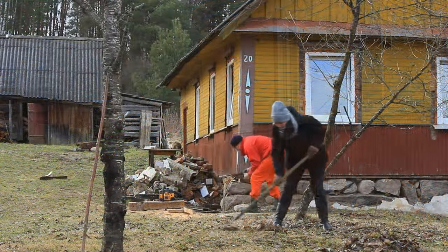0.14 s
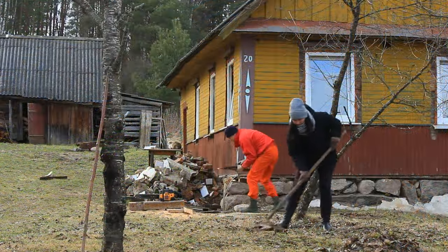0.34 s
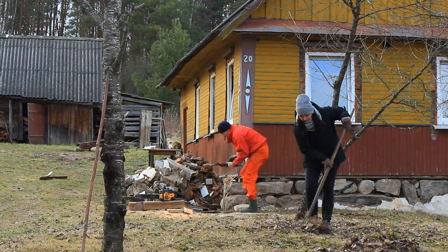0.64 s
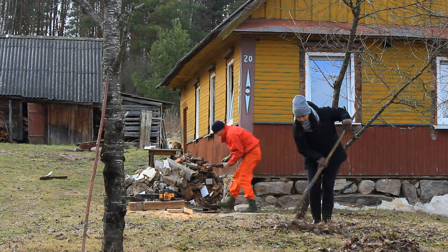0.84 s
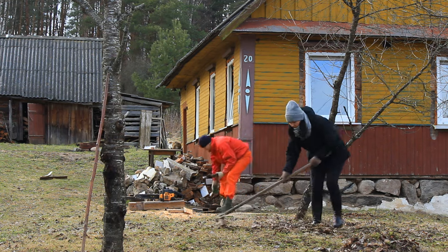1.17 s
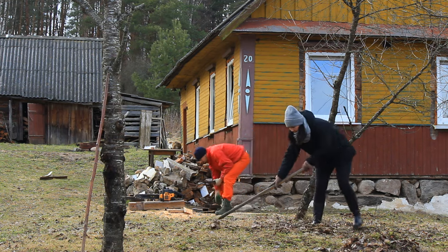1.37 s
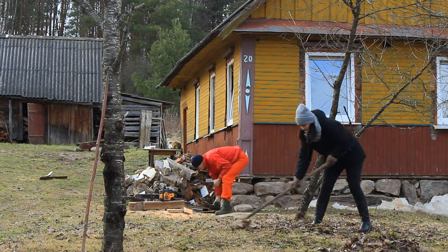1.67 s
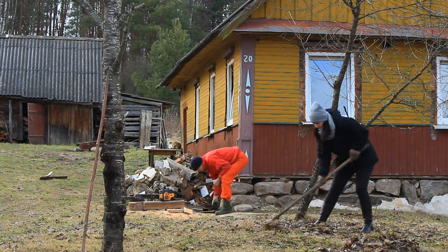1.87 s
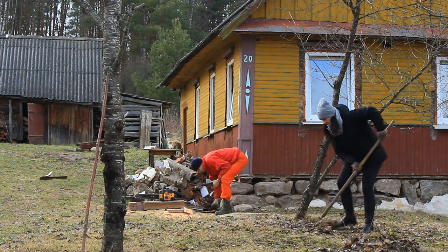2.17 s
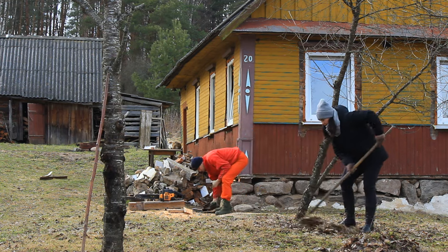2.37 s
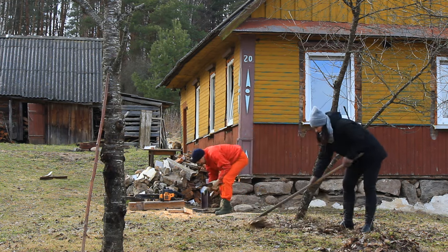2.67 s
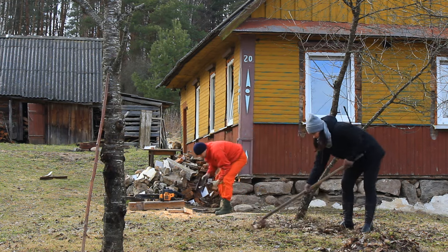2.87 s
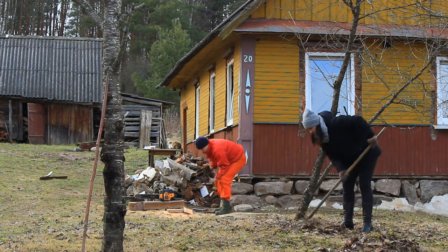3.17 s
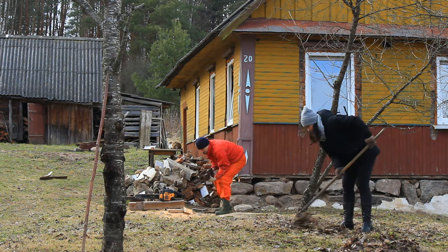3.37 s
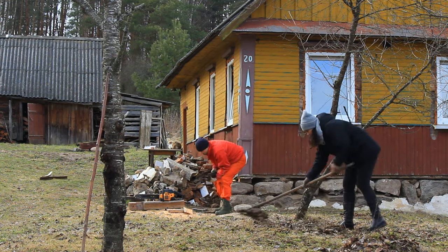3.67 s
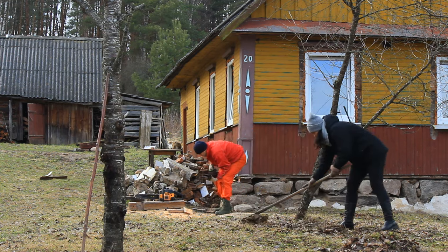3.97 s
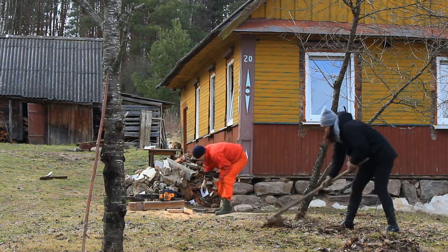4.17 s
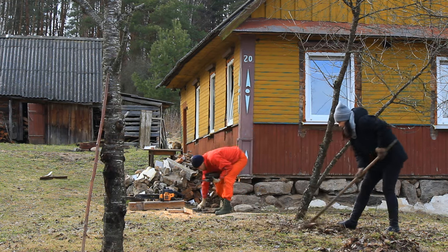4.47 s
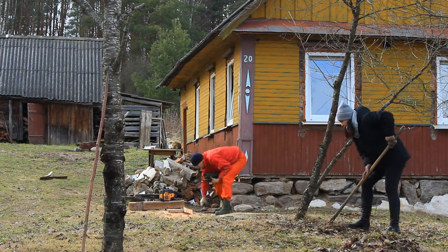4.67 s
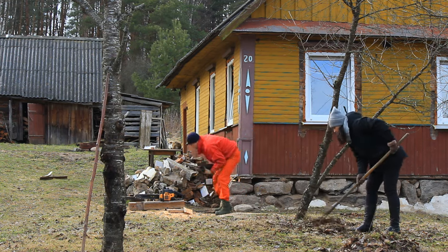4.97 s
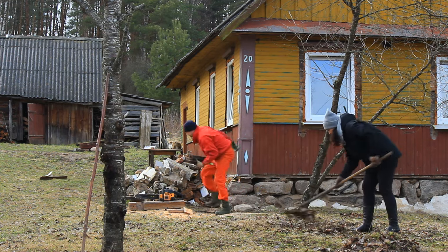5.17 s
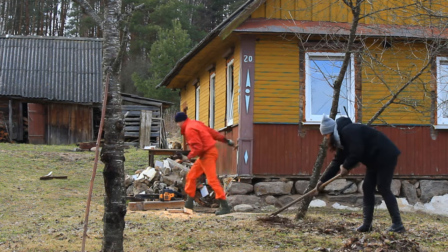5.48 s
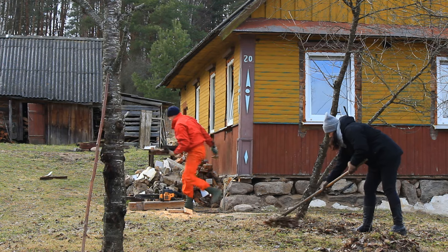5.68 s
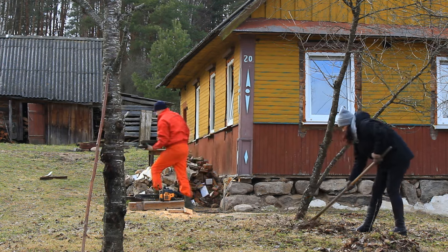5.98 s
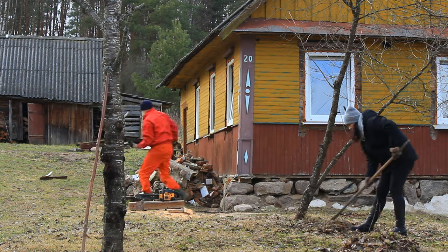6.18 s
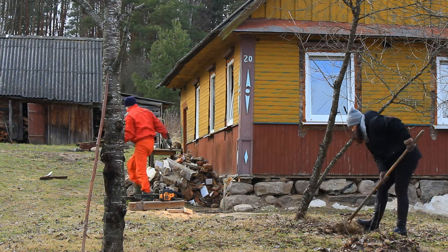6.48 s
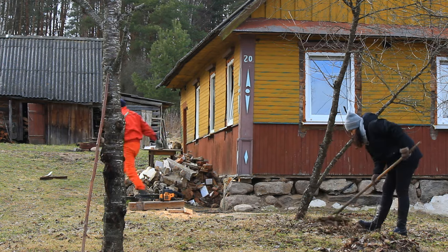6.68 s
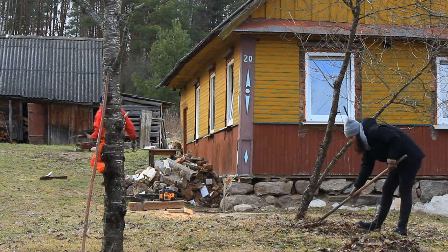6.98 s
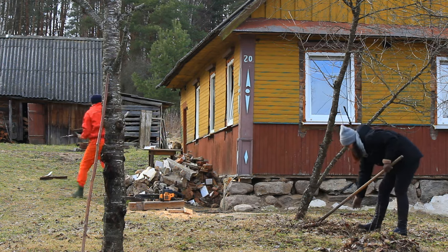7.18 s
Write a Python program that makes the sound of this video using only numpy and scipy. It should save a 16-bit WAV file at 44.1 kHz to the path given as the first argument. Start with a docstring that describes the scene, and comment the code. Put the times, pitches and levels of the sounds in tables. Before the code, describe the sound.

Outdoors beside a wooden house, a person drags a rake again and again through leaves and dry grass, snapping small stalks. Another handles steel and split logs: a bright clank early, a denser metallic clatter in the middle, then hollow wood knocks, the loudest after four seconds and around six. Short yard echoes follow. Faint rooster behind, low gusts on the open microphone, light hiss.

```python
"""Raking leaves in a country yard

Close, straight ahead: a rake crackles again and again through dry leaves and grass, and stalks snap.
Beside the house two pieces of steel land and ring in decaying modes; split firewood knocks and bounces.
Echoes and a dull tail place the knocks, steel and twigs in the yard. Far off, a rooster crows through trees.
Wind lumps on the microphone as low, gusty noise; forest hush and each channel's own hiss lie beneath."""
import sys
import numpy as np
from scipy import signal
from scipy.fft import rfft, irfft, next_fast_len
from scipy.io import wavfile
from scipy.ndimage import uniform_filter1d, minimum_filter1d

SR = 44100
rng = np.random.default_rng(int(sys.argv[2]) if len(sys.argv) > 2 else 0)


def put_to_file(sound):
    """Save the sound as 16-bit audio at rate SR, in the file named by the first command-line argument."""
    columns = np.atleast_2d(sound).T  # one column per channel
    safe = np.clip(columns, -1, 1)
    whole_steps = np.round(safe * 32767)
    wavfile.write(sys.argv[1], SR, whole_steps.astype(np.int16))


N = 323253
TIME = np.arange(N) / SR  # s

# Spectra give relative density per Hz; source levels are before each source's own trim.
# rake strokes; the nearly leafless one at 3.68 s is the heavier steel piece skidding to rest:
# hardest pull t/s, build-up/s, easing off/s, level/dB, leaves over turf/dB
SCRAPE_STROKES = [(0.52, 0.33, 0.36, -45, 0), (1.25, 0.62, 0.75, -54, -7), (1.82, 0.25, 0.15, -49, 0),
                  (2.12, 0.23, 0.2, -41.5, 0), (2.62, 0.3, 0.22, -55, -6), (3.19, 0.28, 0.19, -47, 0.5),
                  (3.68, 0.14, 0.14, -42.5, -18), (4.252, 0.41, 0.14, -48.5, 3.5),
                  (4.55, 0.49, 0.27, -45, 2.5), (5.45, 0.079, 0.21, -53, -4), (5.85, 0.28, 0.27, -49, 4.5),
                  (6.34, 0.35, 0.28, -45.5, 2.5)]
STROKE_DEPTH_DB, STROKE_CURVE = 10.5, 1.32  # fall at build-up or easing time; roundness of the top
TRAIL_DB = -60.5  # tines trailing over the grass between strokes
# colour of tines on turf: f/Hz, density/dB
TURF_SPECTRUM = [(350, -36), (500, -21), (700, -10), (1000, -6.5), (1800, -2), (2450, -3.5), (3400, 0),
                 (4400, -3), (5500, -11), (8000, -25)]
# colour of crushed leaves: f/Hz, density/dB
LEAF_SPECTRUM = [(3500, -15), (5500, -3.5), (7100, 0), (9500, -4), (12000, -9.5), (16000, -19)]
# loudest twigs snapping under the tines: t/s, level/dB
TWIG_SNAPS = [(0.2914, -39), (1.644, -41.5), (2.0777, -29.5), (2.8518, -39.5), (3.2044, -39.5),
              (3.8287, -40.5), (4.2218, -35), (5.522, -36), (6.9052, -46)]
# colour of a snapping twig: f/Hz, density/dB
TWIG_SPECTRUM = [(1500, 4.5), (3500, 1.5), (7000, 4), (11000, -5), (16000, -13)]
STALKS_PER_S, STALK_DB, STALK_SPREAD_DB = 12, -2, 4.5  # small stalks: rate, level over scrape, spread

# contacts of a landing steel bar; the one at 0.5857 s goes with a wooden knock:
# t/s, relative level/dB, hardness/(dB per octave)
BAR_CONTACTS = [(0.4738, 2, -0.5), (0.4850, -10, -15), (0.4928, -19, -7), (0.511, -11.5, 3),
                (0.538, -14, -2.5), (0.5857, -13, -6.5), (0.645, -27, -3)]
# clear modes of the bar: f/Hz, relative level/dB, t60 before shortening/s
BAR_CLEAR_MODES = [(2285, -24, 0.36), (2739, -32, 0.6), (3046, -21, 0.2), (3334, -25, 0.26),
                   (3488, -24, 0.34), (3770, -25, 0.57), (3860, -26, 0.31), (4200, -16, 0.33),
                   (4838, -31, 0.33), (4924, -32, 0.36), (5119, -34, 0.6), (5249, -29, 0.34),
                   (5534, -33, 0.36), (5740, -19, 0.25), (6529, -29, 0.27), (6612, -25, 0.38),
                   (6946, -27, 0.43), (7428, -28, 0.6), (8263, -25, 0.3), (8420, -38, 0.5),
                   (8519, -34, 0.26), (9393, -31, 0.24), (9718, -23, 0.23), (10473, -39, 0.44),
                   (11563, -27, 0.17), (12182, -42, 0.33)]
# colour of the bar's dense clash: f/Hz, density/dB
BAR_CLASH_SPECTRUM = [(1000, -28), (1600, -13), (2300, -2), (3600, 0), (4600, -7), (7000, -8), (9500, -13),
                      (11500, -24)]
# contacts of a heavier steel piece: t/s, relative level/dB, hardness/(dB per octave)
IRON_CONTACTS = [(3.4638, 6.5, 7), (3.4752, 4.5, 1.5), (3.4858, 8, 9.5), (3.502, -18, -8), (3.5128, 4, 5),
                 (3.533, -5.5, 15.5), (3.554, -4, -2), (3.7141, -18, 2), (3.742, -34, -11)]
# clear modes of the heavier piece: f/Hz, relative level/dB, t60 before shortening/s
IRON_CLEAR_MODES = [(1127, -34, 0.37), (1781, -25, 0.33), (1838, -26, 0.43), (1906, -21, 0.6),
                    (2017, -21, 0.3), (2071, -25, 0.39), (2196, -23, 0.31), (2638, -20, 0.28),
                    (2694, -21, 0.32), (2901, -14, 0.24), (2980, -8, 0.22), (3042, -16, 0.34),
                    (3303, -16, 0.25), (3372, -18, 0.32), (3959, -21, 0.29), (4222, -28, 0.35),
                    (4324, -25, 0.29), (4785, -28, 0.26), (4840, -30, 0.36), (5167, -36, 0.41),
                    (5737, -29, 0.2), (6051, -36, 0.24), (6592, -35, 0.26), (6939, -34, 0.5),
                    (8405, -45, 0.5), (9025, -40, 0.29), (9426, -41, 0.34), (10915, -42, 0.23)]
# colour of the heavier piece's dense clash: f/Hz, density/dB
IRON_CLASH_SPECTRUM = [(1000, -12), (1500, -11), (2000, -3), (3100, 0), (4000, -2), (5200, -15),
                       (7300, -21), (11500, -32)]

# firewood knocks; the last is a soft, low-pitched blob, perhaps a footstep on a log:
# t/s, pitch of the log f/Hz, level/dB, hardness of the contact/dB
WOOD_KNOCKS = [(0.381, 2530, -45.5, -7), (0.5853, 2205, -46.5, 5), (1.956, 1820, -29, -4),
               (2.1997, 1990, -45, 4), (2.6143, 2040, -54, 7), (2.6771, 2290, -48.5, -1),
               (2.93, 1960, -48, -6), (3.6841, 2090, -45, -3), (3.865, 2300, -49, 3),
               (4.016, 2050, -43.5, 7), (4.333, 1860, -45, 3.5), (4.4288, 2175, -21, 3.5),
               (5.35, 2090, -52.5, 4.5), (5.5364, 2420, -44.5, -17), (5.66, 2015, -39, -7.5),
               (5.8242, 2176, -34, -19), (5.9067, 2106, -30, 5), (6.0527, 1990, -24, -6),
               (6.122, 1870, -43, -6), (6.2142, 2050, -38, -0.2), (6.2726, 2050, -45.5, 2),
               (6.337, 1857, -40, 3.5), (6.962, 1313, -50, -4)]
# modes of a log: multiple of its pitch, relative level/dB, t60/s
WOOD_MODES = [(0.628, -6, 0.034), (0.711, -7.5, 0.044), (.81, -6.5, .05), (.94, 1.5, 0.036),
              (1.001, 6.5, 0.044), (1.091, 3, .04), (1.399, -4.5, .04), (1.55, -9, .035),
              (1.931, -9, 0.072), (2.12, -4.5, 0.013), (2.7, -15, 0.068), (3.3, -10.5, .03),
              (3.6, -38, 0.037)]
# a log drops back once: delay, level, and how much higher a hard contact throws it (dB per dB)
BOUNCE_S, BOUNCE_DB, BOUNCE_PER_HARDNESS = 0.028, -9.5, 0.82
# echoes off ground, walls and woodpile: delay/s, level/dB
NEAR_ECHOES = [(.0075, -20.5), (0.0173, -11.5), (0.028, -38), (.043, -34.5)]

# notes of the rooster: start t/s, length/s, top pitch f/Hz, level/dB
ROOSTER_NOTES = [(0.96, 0.27, 839, -48), (1.24, 0.26, 671.6, -52), (1.6, 0.24, 658, -49.5),
                 (1.92, 0.58, 693, -54), (3.23, 0.3, 840.4, -48), (3.61, 0.5, 700.3, -53),
                 (7.19, 0.33, 847, -48)]
# harmonics of its voice: multiple of the pitch, relative level/dB
ROOSTER_HARMONICS = [(1, -0.5), (2, -4), (3, -8)]
CROW_START_HZ, CROW_SCOOP_S = 647, 0.058  # every note slides up from the same low pitch
CROW_ATTACK_S, CROW_RELEASE_S, CROW_FADE_DB = 0.056, 0.077, 12.5  # fade is over the note's length

# breeze leaning on the microphone: t/s, level/dB
BREEZE_LEVEL = [(0.0, -45.5), (1.02, -37.5), (2.78, -44), (3.12, -32.5), (3.25, -43), (4.9, -50.5),
                (5.53, -38.5), (5.57, -56), (7.33, -46)]
# gusts: t/s, half length/s, level/dB
WIND_GUSTS = [(0.14, 0.04, -48), (0.626, 0.08, -43.5), (0.779, 0.081, -33), (1.054, 0.056, -43),
              (1.547, 0.14, -57), (1.915, 0.048, -47), (2.141, 0.047, -39), (2.275, 0.025, -37),
              (2.545, 0.066, -49), (3.088, 0.13, -44.5), (4.915, 0.028, -52), (5.497, 0.047, -57),
              (7.275, 0.064, -48)]
# colour of slow wind pressure: f/Hz, density/dB
PUSH_SPECTRUM = [(12, 0.5), (22, -9), (35, -19), (55, -33), (90, -43.5)]
# colour of the faster eddies: f/Hz, density/dB
BUFFET_SPECTRUM = [(35, 6.5), (55, 5.5), (85, 4), (125, -10), (190, -15), (260, -27.5), (450, -46)]
# colour of the far hush and the hiss: f/Hz, density/dB
AIR_SPECTRUM = [(88, -54), (150, -7.5), (240, -22), (348, -11), (504, -17.5), (566, -10), (805, -4),
                (2450, -2.5), (3350, -1), (5050, -4), (7040, -4), (15100, -6), (16000, -7)]
# difference between the two channels: f/Hz, unlike share of power (0 to 1)
HISS_UNLIKE = [(100, .02), (350, 0.03), (1000, 0.12), (3000, 0.24), (6000, 0.46), (12000, 0.5),
               (16000, 0.57)]
AIR_DB = -50.5
CUTOFF_HZ = 15900


def pulling():
    """Strength on turf and in leaves: each stroke builds up to its hardest pull and eases off."""
    turf_power = leaf_power = from_db(TRAIL_DB) ** 2
    for s, build_s, ease_s, db, leafy_db in SCRAPE_STROKES:
        away = np.maximum((s - TIME) / build_s, (TIME - s) / ease_s)
        sunk_db = STROKE_DEPTH_DB * np.minimum(np.abs(away), 10) ** STROKE_CURVE
        pull = from_db(db - sunk_db)
        turf_power = turf_power + pull ** 2
        leaf_power = leaf_power + (pull * from_db(leafy_db)) ** 2
    return np.sqrt(turf_power), np.sqrt(leaf_power)


def rake(scrape, rustle, scrape_db=0.0, rustle_db=-3.0, catch_db=1.37, per_s=13000, spread_db=1.5):
    """Tines drag through turf and crush leaves; they catch and spring free, so the crackle clumps."""
    catching = catch_db * drift(14)
    turf_grains = coloured(grains(per_s, spread_db), TURF_SPECTRUM)
    leaf_grains = coloured(grains(per_s, spread_db), LEAF_SPECTRUM)
    turf = scrape * from_db(scrape_db + catching) * turf_grains
    leaves = rustle * from_db(rustle_db + catching) * leaf_grains
    # trailing lightly between strokes, the rake barely stirs anything
    pressure = np.clip((20 * np.log10(scrape) + 61) / 9, .1, 1)
    return pressure * (turf + leaves)


def twigs(scrape, level_db=-3.0, t60=0.13):
    """A dry stalk breaks in a short splintering burst; a harder pull makes the small ones louder."""
    breaks = rng.random(N) < STALKS_PER_S / SR
    stalks = breaks * scrape * from_db(STALK_DB + STALK_SPREAD_DB * rng.standard_normal(N))
    bursts = dying(clicks(TWIG_SNAPS) + stalks, t60)
    return from_db(level_db) * bursts * noise(TWIG_SPECTRUM)


def steel(hits, modes, clash, lowest_hz, ring_db, clash_db, clash_t60, ring_share, rest_s, rest_t60,
          count=130):
    """Contacts ring clear modes and a dense, brief clash; once the piece lies still, the ring is damped."""
    s, level, hardness = np.transpose(hits)
    start, size = round(hits[0][0] * SR), SR // 2

    def mode(hz, db, t60):
        """The contacts share the energy of one blow; hard ones favour the high modes."""
        # a small random delay per mode and contact keeps the modes from starting together
        delay = rng.uniform(0, .001, len(s))
        at = np.maximum(np.round((s + delay) * SR).astype(int) - start, 0)
        force = np.zeros(size)
        force[at] = rng.choice([-1, 1], len(s)) * from_db(level + hardness * np.log2(hz / 3000))
        # rms of a decaying sine, so that a longer ring carries more energy
        decay_rms = np.sqrt(t60 * SR / size / (4 * np.log(1000)))
        return from_db(db) * decay_rms * rms_one(ring(force, hz, t60))

    clear = sum(mode(hz, db + ring_db, t60 * ring_share) for hz, db, t60 in modes)
    pitches = np.geomspace(850, 11500, count) * rng.uniform(.99, 1.01, count)
    # higher modes lie farther apart in Hz, so each stands for a wider band
    levels = at_hz(clash, pitches) + 10 * np.log10(pitches / pitches[0]) + clash_db
    dense = sum(mode(hz, db, clash_t60) for hz, db in zip(pitches, levels))
    damping = from_db(-60 * np.maximum(TIME[start:start + size] - rest_s, 0) / rest_t60)
    radiation = signal.butter(4, [lowest_hz, 12500], "band", fs=SR, output="sos")
    sound = signal.sosfilt(radiation, clear * damping + dense)
    return np.pad(sound, (start, N - start - size))


def firewood(body_db=1.0, upper_db=0.0, crack_db=-8.0, rough=0.99, rough_t60=0.068,
             contact_s=0.00021, size=8192):
    """Logs ring with crunching bark and bounce once; hard contacts bring more upper modes and crack."""
    out, t = np.zeros(N + size), np.arange(size) / SR
    bounces = []
    for s, pitch, level, hard in WOOD_KNOCKS:
        bounce_level = level + BOUNCE_DB + BOUNCE_PER_HARDNESS * min(hard, 4)
        bounces.append((s + BOUNCE_S, pitch, bounce_level, hard - 2.5))
    for s, pitch, level, hard in list(WOOD_KNOCKS) + bounces:
        modes = np.zeros(size)
        for ratio, db, t60 in WOOD_MODES:
            wave = np.sin(2 * np.pi * (pitch * ratio * t + rng.random()))
            modes += from_db(db - 60 * t / t60) * wave
        bark = rough * rng.standard_normal(size) * from_db(-60 * t / rough_t60)
        blow = (modes + bark) * (1 - np.exp(-t / contact_s))
        parts = [(band(blow, 1290, 2310), body_db),
                 (band(blow, 2980, 4750), hard + upper_db),
                 (band(blow, 5480, 7330), hard + crack_db)]
        at = round(s * SR)
        for part, db in parts:
            # each band's level is set over its first 15 ms
            out[at:at + size] += from_db(level + db) * part / np.std(part[t < .015])
    return out[:N]


def yard(x, lowest_hz=720):
    """Small things radiate little bass; near echoes and a thin, dull tail from the forest edge follow."""
    x = signal.sosfilt(signal.butter(4, lowest_hz, "high", fs=SR, output="sos"), x)
    echoes = sum(from_db(db) * np.interp(TIME - delay, TIME, x, left=0) for delay, db in NEAR_ECHOES)
    wide_tail = scatter(x, t60=0.83, low_hz=865, high_hz=5100, gain_db=-25.0)
    dull_tail = scatter(x, t60=0.59, low_hz=1100, high_hz=2030, gain_db=-23.5)
    return x + echoes + wide_tail + dull_tail


def scatter(x, t60, low_hz, high_hz, gain_db):
    """Countless faint reflections from trees and buildings, as a decaying noise response."""
    t = TIME[:SR]
    tail = band(rng.standard_normal(SR), low_hz, high_hz)
    tail = tail * from_db(-60 * t / t60) * (1 - np.exp(-t / 0.0057))
    return from_db(gain_db) * signal.fftconvolve(x, tail / np.sqrt(np.sum(tail ** 2)))[:N]


def rooster(level_db=0.0, strain=0.043, direct=0.1):
    """A hoarse far crow, roughest where pushed highest, smeared by its long way through the trees."""
    out, waver = np.zeros(N), drift(59.6)
    for start, length, top_hz, db in ROOSTER_NOTES:
        t = np.maximum(TIME - start, 0)
        pitch = top_hz + (CROW_START_HZ - top_hz) * np.exp(-t / CROW_SCOOP_S)
        hoarse = .035 + strain * np.clip((pitch - 690) / 100, 0, 1)  # relative pitch jitter
        phase = 2 * np.pi * np.cumsum(pitch * (1 + hoarse * waver)) / SR
        envelope = np.clip(np.minimum(t / CROW_ATTACK_S, 1 + (length - t) / CROW_RELEASE_S), 0, 1)
        voice = sum(from_db(h_db) * np.sin(k * phase) for k, h_db in ROOSTER_HARMONICS)
        out += envelope * from_db(db + level_db - CROW_FADE_DB * t / length) * voice
    return direct * out + scatter(out, t60=0.42, low_hz=534, high_hz=3370, gain_db=-3.5)


def wind(push_db=1.0, buffet_db=0.0, gust_push_db=-3.5, breeze_buffet_db=-27.5, waver_db=1.5):
    """Air leans on the microphone; gusts swell, shed faster eddies and pass."""
    breeze = from_db(in_time(BREEZE_LEVEL)[0] + waver_db * drift(10))
    gusts = sum(from_db(db) / (1 + ((TIME - s) / half_s) ** 2) ** 2 for s, half_s, db in WIND_GUSTS)
    push = from_db(push_db) * breeze + from_db(gust_push_db) * gusts
    buffet = from_db(breeze_buffet_db) * breeze + from_db(buffet_db) * gusts
    return push * eddies(PUSH_SPECTRUM) + buffet * eddies(BUFFET_SPECTRUM)


def eddies(spectrum, steady_s=0.075):
    """Turbulent pressure noise, evened out by its own short-term power."""
    x = noise(spectrum)
    return x / np.sqrt(uniform_filter1d(x ** 2, int(steady_s * SR)) + 0.038)


def air(level_db=0.0):
    """Far forest hush, alike in both channels, under a hiss that differs between them."""
    hz = np.arange(N // 2 + 1) * SR / N
    apart = np.clip(at_hz(HISS_UNLIKE, hz), 0, 1)
    mid = noise(AIR_SPECTRUM)
    side = irfft(rfft(noise(AIR_SPECTRUM)) * np.sqrt(apart / (1.001 - apart)), N)
    return from_db(AIR_DB + level_db) * (mid + side * np.array([[1], [-1]]))


def from_db(db):
    """Decibels to gain."""
    return 10 ** (np.asarray(db) / 20)


def rms_one(x):
    """Scale to unit power."""
    return x / np.sqrt(np.mean(x ** 2) + 1e-20)


def in_time(rows):
    """Each column of a curve at every sample."""
    s, *columns = np.transpose(rows)
    return [np.interp(TIME, s, c) for c in columns]


def at_hz(points, hz):
    """Read a spectrum on a log-frequency axis."""
    points = np.array(points)
    return np.interp(np.log(hz + 1e-3), np.log(points[:, 0]), points[:, 1])


def coloured(x, spectrum):
    """Give a signal a spectrum that falls away beyond its ends; rms 1."""
    size = next_fast_len(len(x))
    hz = np.arange(size // 2 + 1) * SR / size + 1e-3
    low_skirt = np.minimum(1, hz / spectrum[0][0]) ** 3
    high_skirt = np.minimum(1, spectrum[-1][0] / hz) ** 3
    shape = from_db(at_hz(spectrum, hz)) * low_skirt * high_skirt
    return rms_one(irfft(rfft(x, size) * shape, size)[:len(x)])


def noise(spectrum):
    """Noise of a given colour; rms 1."""
    return coloured(rng.standard_normal(N), spectrum)


def drift(rate_hz):
    """Slow chance with a spread of 1: noise through two equal low-pass poles, one value per 40 samples."""
    r = np.exp(-80 * np.pi * rate_hz / SR)
    slow = signal.lfilter([1], [1, -2 * r, r * r], rng.standard_normal(N // 40 + 2002))
    slow = slow[2000:]  # drop the run-in
    return np.interp(np.arange(N) / 40, np.arange(len(slow)), rms_one(slow))


def band(x, low_hz, high_hz):
    """Causal band-pass."""
    edges = [low_hz, min(high_hz, SR / 2 - 100)]
    return signal.sosfilt(signal.butter(2, edges, "band", fs=SR, output="sos"), x)


def clicks(hits):
    """One impulse for each row (t/s, level/dB)."""
    out = np.zeros(N)
    for s, db in hits:
        out[round(s * SR)] += from_db(db)
    return out


def dying(x, t60):
    """Each impulse starts an exponential decay."""
    return signal.lfilter([1], [1, -from_db(-60 / (t60 * SR))], x + 1e-18)


def ring(x, hz, t60):
    """A two-pole resonator: a unit impulse starts a decaying sine of initial height 1."""
    r, w = from_db(-60 / (t60 * SR)), 2 * np.pi * hz / SR
    return signal.lfilter([0, np.sin(w)], [1, -2 * r * np.cos(w), r * r], x + 1e-18)


def grains(per_s, spread_db):
    """Tiny fractures at random moments, mostly small and a few large."""
    sizes = from_db(spread_db * np.minimum(rng.exponential(1, N), 4)) * rng.standard_normal(N)
    return sizes * (rng.random(N) < per_s / SR)


def scene():
    """The work lies straight ahead, the same in both channels; only the air differs between them."""
    scrape, rustle = pulling()
    bar = steel(BAR_CONTACTS, BAR_CLEAR_MODES, BAR_CLASH_SPECTRUM, lowest_hz=1450, ring_db=2.5,
                clash_db=-30.5, clash_t60=0.074, ring_share=0.61, rest_s=0.684, rest_t60=0.89)
    iron = steel(IRON_CONTACTS, IRON_CLEAR_MODES, IRON_CLASH_SPECTRUM, lowest_hz=680, ring_db=3.0,
                 clash_db=-28.5, clash_t60=0.17, ring_share=0.52, rest_s=3.6, rest_t60=0.46)
    impacts = yard(bar + iron + firewood() + twigs(scrape))
    return impacts + rake(scrape, rustle) + rooster() + wind() + air()


def record(dry):
    """A quick look-ahead limiter holds the loudest peaks, and the top is cut."""
    ceiling, window = .8, round(.004 * SR)
    allowed = ceiling / np.maximum(np.abs(dry).max(axis=0), ceiling)
    gain = uniform_filter1d(minimum_filter1d(allowed, 2 * window), window)
    top_cut = signal.ellip(12, .1, 80, CUTOFF_HZ, fs=SR, output="sos")
    return signal.sosfilt(top_cut, dry * gain)


dry = scene()
out = record(dry)
put_to_file(out)
```